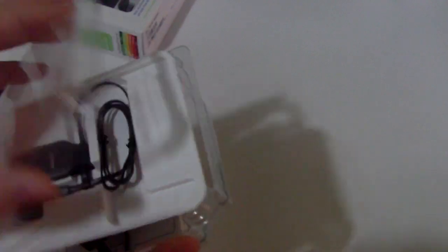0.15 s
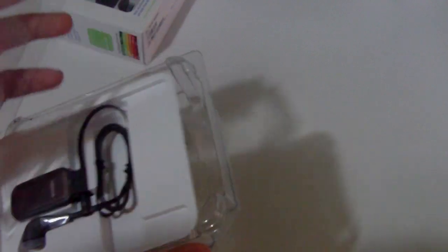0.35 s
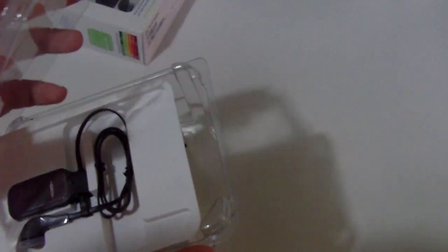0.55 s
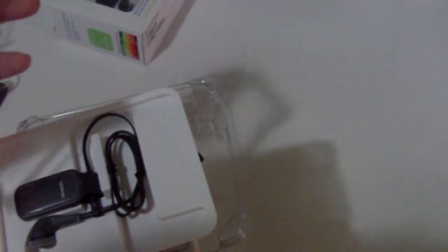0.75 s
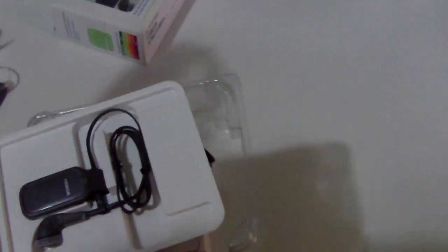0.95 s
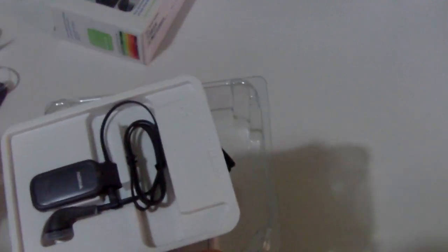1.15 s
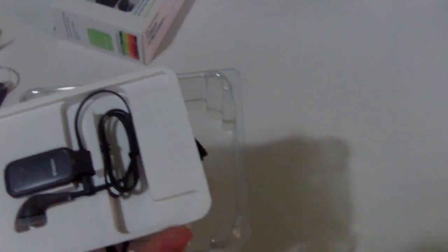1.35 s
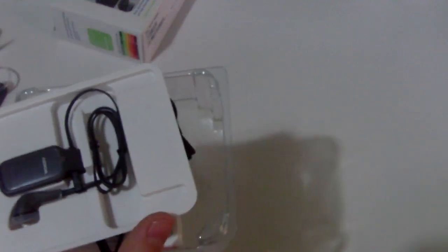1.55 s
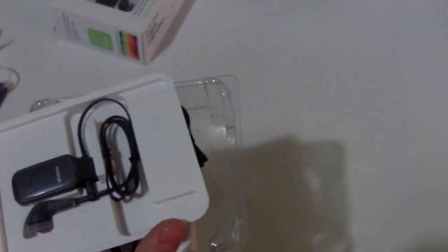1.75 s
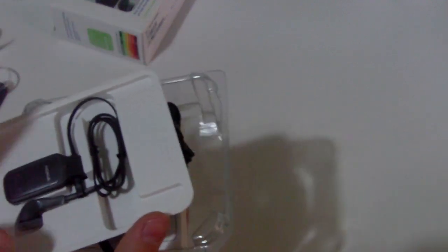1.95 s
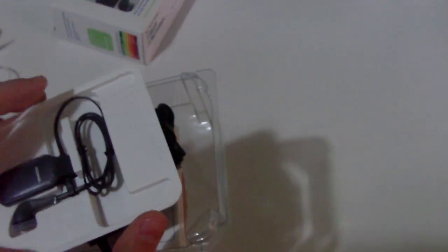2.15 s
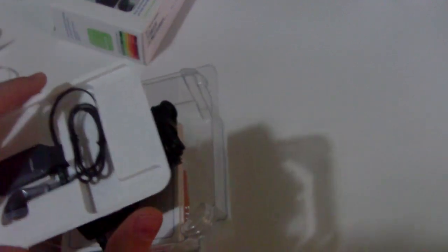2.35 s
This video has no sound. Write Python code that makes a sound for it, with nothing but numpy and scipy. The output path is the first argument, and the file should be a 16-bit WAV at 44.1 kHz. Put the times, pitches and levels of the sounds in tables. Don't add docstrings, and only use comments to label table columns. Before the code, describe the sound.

Close, dry handling of a clear plastic shell: quick crackles, one loud snap, faint card rubbing and finger slides, a brief clicky turn, then more light pops as the tray comes free, over faint room noise.

```python
import sys
import numpy as np
from scipy import signal
from scipy.fft import rfft, irfft
from scipy.io import wavfile

SR = 44100
rng = np.random.default_rng(int(sys.argv[2]) if len(sys.argv) > 2 else 0)


def to_wav(s):
    ch = np.atleast_2d(s).T
    pcm = np.round(np.clip(ch, -1, 1) * 32767)
    wavfile.write(sys.argv[1], SR, pcm.astype(np.int16))


def boost(x):
    u = np.asarray(x, float) / 20
    return 10 ** u


N = 105840

# pitch_hz, density_db_per_hz
FLOOR_SPECTRUM = [(25, -39.5), (100, -50.5), (220, -22), (600, -7.5), (1170, -1.5), (1700, -6),
                  (2550, -13.5), (15500, -31)]
# time_s, level_db
RUSTLE_LEVEL = [(0, -65), (.3, -67.5), (.62, -64), (.78, -68), (.95, -59.5), (1.1, -58.5), (1.31, -65),
                (1.345, -55.5), (1.4, -55), (1.47, -53), (1.53, -53.5), (1.63, -64.5), (1.98, -65.5),
                (2.25, -60.5), (2.4, -68)]
# pitch_hz, density_db_per_hz
RUSTLE_SPECTRUM = [(60, -32.5), (150, -18), (425, 2), (570, 4), (1100, -3), (1500, -3), (4200, -11.5),
                   (15000, -27.5)]
# time_s, level_db
HOLLOW_LEVEL = [(1.6, -71), (1.65, -59), (1.7, -52), (1.77, -56), (1.8, -62), (1.95, -60), (2.02, -74)]
# start_s, attack_s, hold_s, release_s, level_db
FINGER_SLIDES = [
    (0.903, 0.088, 0.15, 0.023, -55.5),
    (1.716, 0.11, 0.11, 0.018, -60.5),
]
# pitch_hz, density_db_per_hz
SLIDE_SPECTRUM = [(800, -48), (1600, 2), (5500, 5), (7000, 4.5), (12000, -1.5), (15500, -15)]
# start_s, length_s, level_db,
# tilt_db_per_octave, rise_share
SCUFFS = [(0.059, 0.03, -42, -12, 0.32), (.1, 0.027, -47, -19, 0.48),
          (0.145, 0.036, -65, 5.5, 0.55), (0.247, 0.021, -32, 4, 0.36),
          (0.252, 0.11, -36.5, -4, 0.045), (0.325, 0.083, -53.5, -1.5, 0.28),
          (0.447, 0.058, -48.5, -31, 0.67), (.552, 0.021, -46, -20, 0.36),
          (0.569, 0.045, -49.5, 1, 0.38), (0.607, 0.049, -50.5, -28.5, 0.33),
          (1.321, 0.037, -62.5, -3, 0.14), (1.384, 0.12, -64, 9, .05),
          (1.476, 0.29, -55.5, 1, 0.071), (2.091, 0.0451, -55.5, 5, 0.96),
          (2.131, 0.045, -51, -3, 0.18), (2.173, 0.046, -47, 3, 0.43), (2.21, .035, -69, -12, 0.25),
          (2.281, 0.08, -46.5, -4, 0.53), (2.344, 0.039, -52.5, 4.5, 0.31),
          (2.352, 0.041, -55, 5.5, 1)]
# pitch_hz, width_hz, level_db
SCUFF_RESONANCES = [(1026, 290, 0.1), (2460, 640, -1), (4980, 700, -10), (8200, 5000, -13)]
# time_s, peak_db, width_ms, sign
FACE_FLIPS = [
    (.1268, -24.5, 0.063, -1),
    (0.1942, -32, 0.18, -1),
    (0.4988, -45, 0.069, 1),
    (.2486, -10, 0.1, -1),
    (0.2548, -3.5, .15, -1),
    (1.4824, -18, 0.11, 1),
    (2.0168, -28.5, 0.12, -1),
    (2.2454, -43, 0.17, -1),
    (2.256, -17, 0.16, -1),
]
# pitch_hz, level_db
SHELL_SPECTRUM = [(250, -33.5), (500, -17), (1000, -9), (2400, 0), (5000, -4), (9000, -7.5), (15000, -9)]
# time_s, peak_db, ring_hz, treble_db, length_ms
PRY_BUCKLES = [(.009, -49.5, 1500, -12, 4.4), (.0274, -29.5, 900, -12, 1.2),
               (.0585, -30.5, 1100, -18.5, 1.49), (.071, -40, 1180, -12.5, 2.9),
               (.080, -43, 1100, -28.5, 2.5), (.0855, -23, 950, -21, 3.01), (.127, -26, 1000, -15.5, 1.77),
               (.142, -29.5, 1070, -18, 1.96), (.182, -34.5, 1470, -7.5, 2.6), (.1958, -18, 1240, -10, 2.3),
               (.225, -22.5, 2340, -33, 1.49), (.2474, -5, 2580, -11.5, 2.6), (.2510, -7.5, 5530, 4, 2.22),
               (.2535, -3.5, 2400, -14.5, 1.3), (.260, -11.5, 1200, -15, 3.8), (.269, -16, 2800, -7, 3.9),
               (.287, -29.5, 2800, -1, 1.5), (.3035, -27.5, 2260, 0, 2.8), (.334, -33.5, 1080, -4, 2.7),
               (.343, -27, 1580, -11.5, 2.7), (.378, -35.5, 1310, -14.5, 2.14), (.498, -41, 2700, -8, 0.65)]
# time_s, peak_db, ring_hz, treble_db, length_ms
TURN_BUCKLES = [(.461, -42.5, 1090, -36, 1.54), (.489, -50, 1190, -21, 1.37), (.571, -36, 917, -35.5, 3.6),
                (.620, -42, 942, -45, 2.5), (.634, -44.5, 950, -30, 2.15), (.679, -49, 907, -30.5, 4.7),
                (.686, -44, 926, -39, 2.1), (.9525, -41, 1305, -9.5, 1.9), (1.057, -47.5, 523, -38.5, 1.16),
                (1.073, -57, 550, -25, 0.82), (1.132, -47, 2720, -20, 6.0), (1.142, -43.5, 3070, -16, 4.6),
                (1.221, -54, 4800, -15, 1.1), (1.332, -39.5, 575, -2, 0.85), (1.3435, -49, 694, -4, 0.63),
                (1.3684, -33.5, 2900, -13, 1.03), (1.388, -27, 600, -4, 1.57), (1.3905, -38, 3650, 15, 2.1),
                (1.3945, -29.5, 706, -6.5, 4.5), (1.399, -44, 3870, 5, 1.6), (1.427, -41, 7500, 3, 4.8),
                (1.4455, -38.5, 7400, 2, 1), (1.477, -52, 4500, -16, 1.5), (1.4835, -31, 1800, -15, 0.62),
                (1.5088, -34, 3170, -2, 1.24), (1.5115, -28.5, 584, -16, 2.78), (1.673, -46, 2830, -8, 2.1),
                (1.692, -52, 1280, -31.5, 2.4)]
# time_s, peak_db, ring_hz, treble_db, length_ms
PULL_BUCKLES = [(2.0058, -40.5, 5130, -14.5, 1.3), (2.0158, -35.5, 1200, -27, 1.6),
                (2.048, -43, 1130, -22, 1.33), (2.0662, -37.5, 888, -43, 2), (2.076, -48, 1150, -14, 3.5),
                (2.089, -45, 1190, -30, 1.55), (2.1068, -31, 1150, -33, 2.64),
                (2.1408, -31.5, 1190, -19, 2.0), (2.1455, -35, 555, -32, 1.6),
                (2.188, -32.5, 3030, -19, 2.13), (2.1915, -28, 1050, -11, 1.62),
                (2.198, -33, 5200, -21, 2.9), (2.204, -38, 2250, -27, 3.1),
                (2.2462, -23.5, 1240, -20.5, 2.27), (2.2565, -29, 1120, -13, 0.93),
                (2.271, -36, 4970, -8, 0.79), (2.2742, -29.5, 2700, -23, 1.14),
                (2.2748, -26, 5070, -21.5, 0.956), (2.2868, -27, 990, -20, 3.2),
                (2.294, -38, 960, -27, 0.94), (2.312, -41, 1000, -31, 2.0), (2.329, -37.5, 1030, -30, 1),
                (2.382, -41, 2500, -6, 2.5)]


def rms_one(x):
    return x / np.sqrt(np.mean(x ** 2) + 1e-20)


def at(points, x, warp=np.log):
    p = np.array(points)
    return np.interp(warp(x), warp(p[:, 0]), p[:, 1])


def colour(x, spectrum):
    hz = np.maximum(np.arange(len(x) // 2 + 1) * SR / len(x), 10)
    return irfft(rfft(x) * boost(at(spectrum, hz)), len(x))


def peak(x, hz, width_hz):
    r = np.exp(-np.pi * width_hz / SR)
    feedback = [1, -2 * r * np.cos(2 * np.pi * hz / SR), r * r]
    return signal.lfilter([(1 - r * r) / 2, 0, (r * r - 1) / 2], feedback, x)


def low_cut(x, hz):
    return signal.sosfilt(signal.butter(3, hz, "high", fs=SR, output="sos"), x)


def drift(rate_hz):
    r = np.exp(-2 * np.pi * rate_hz / SR)
    wander = signal.lfilter([1], [1, -2 * r, r * r], rng.standard_normal(N + SR))
    return rms_one(wander[SR:])


def grains(per_s, spread_db):
    size_db = spread_db * np.minimum(rng.exponential(1, N), 4)
    size = boost(size_db) * rng.choice([-1, 1], N)
    return rms_one(size * (rng.random(N) < per_s / SR))


def room_floor():
    return boost(-64.5) * rms_one(colour(rng.standard_normal(N), FLOOR_SPECTRUM))


def room(x):
    t60_s, build_up_s, treble_decay_s, wall_cut_hz = 0.25, 0.011, 0.12, 9200
    t = np.arange(SR // 2) / SR
    noise = rng.standard_normal((2, SR // 2))
    dull = signal.lfilter(*signal.butter(1, wall_cut_hz / 3, fs=SR), noise[0])
    bright = 0.21 * noise[1] * np.exp(-t / treble_decay_s)
    tail = (dull + bright) * boost(-60 * t / t60_s) * np.clip(t / build_up_s, 0, 1)
    return signal.fftconvolve(x, tail / np.sqrt(np.sum(tail ** 2)))[:N]


def rustle():
    hollow_hz = 1280
    t = np.arange(N) / SR
    rub = rms_one(colour(grains(5700, 2.5), RUSTLE_SPECTRUM))
    rub = rub * boost(at(RUSTLE_LEVEL, t, np.asarray) + 1.5 * drift(25))
    narrow = peak(grains(4000, 3.1), hollow_hz, 60)
    hollow = rms_one(peak(narrow, hollow_hz, 340))
    gate = (t > HOLLOW_LEVEL[0][0]) & (t < HOLLOW_LEVEL[-1][0])
    return rub + hollow * gate * boost(at(HOLLOW_LEVEL, t, np.asarray) - 3.5)


def slides():
    echo_s, echo_gain = 0.0003, 0.4
    t = np.arange(N) / SR
    hiss = colour(rng.standard_normal(N), SLIDE_SPECTRUM)
    hz = np.arange(N // 2 + 1) * SR / N
    echo = irfft(rfft(hiss) * np.exp(-2j * np.pi * hz * echo_s), N)
    hiss = rms_one(hiss + echo_gain * echo)
    swell = np.zeros(N)
    for start, attack, hold, release, db in FINGER_SLIDES:
        corners = np.cumsum([start, attack, hold, release])
        swell += boost(db) * np.interp(t, corners, [0, 0.99, 0.38, 0.068])
    return hiss * swell * boost(0.98 * drift(9.6))


def scuffs():
    t = np.arange(N) / SR
    grit = grains(14000, 3)
    out = np.zeros(N)
    for hz, width_hz, db in SCUFF_RESONANCES:
        swell = np.zeros(N)
        for start, length, level_db, tilt_db, rise in SCUFFS:
            gain = boost(level_db + db + tilt_db * np.log2(hz / 1000))
            swell += gain * np.interp(t, [start, start + rise * length, start + length], [0, 1, 0])
        out += peak(grit * swell, hz, width_hz) * np.sqrt(SR / width_hz / 4)
    return signal.sosfilt(signal.butter(2, 9600, fs=SR, output="sos"), out)


def pops():
    t = np.arange(N) / SR
    push = np.zeros(N)
    for s, db, width_ms, sign in FACE_FLIPS:
        push += sign * boost(db) * np.exp(-((t - s) * 1000 / width_ms) ** 2)
    return low_cut(push, 714) + boost(-36.5) * push


def slip_burst(length_ms, delays, sizes):
    shares = np.cumsum(0.15 + 0.3 * np.abs(delays))
    shares = shares - shares[0]
    burst = np.zeros(2048)
    for share, size in zip(shares, sizes):
        position = share * length_ms / 1000 * SR
        i = int(position)
        slip = np.sign(size) * boost(-8 * share + 2 * size)
        burst[i:i + 2] += slip * np.array([1 + i - position, position - i])
    return burst


def buckles(rows):
    t60_s, t60_slope, rise_cycles = 0.037, 0.8, 0.71
    ring_db, ring_oct, region_db, region_oct = 10.5, 0.2, 6.5, 1.7
    usual_treble_db, mode_spread_db = -18, 2
    t = np.arange(3072) / SR
    hz = np.geomspace(300, 16000, 150)
    decay_rate = np.log(1000) * (np.maximum(hz, 800) / 1000) ** t60_slope / t60_s
    rings = np.exp(-np.outer(decay_rate, t))
    rings = rings * (1 - np.exp(-np.outer(hz, t) / rise_cycles))
    out = np.zeros(N + SR)
    for s, db, ring_hz, treble_db, length_ms in rows:
        level, detune, slip = rng.standard_normal((3, len(hz)))
        octaves = np.log2(hz / ring_hz)
        gain_db = at(SHELL_SPECTRUM, hz) + mode_spread_db * level
        gain_db += ring_db * np.exp(-(octaves / ring_oct) ** 2)
        gain_db += region_db * np.exp(-(octaves / region_oct) ** 2)
        gain_db += (treble_db - usual_treble_db) * np.clip(np.log2(hz / 2000), 0, 1)
        modes = rings * np.sin(2 * np.pi * np.outer(hz * (1 + 0.01 * detune), t))
        body = (boost(gain_db) * np.sign(slip)) @ modes
        hit = signal.fftconvolve(slip_burst(length_ms, slip[:6], detune[:6]), body)
        i = int(s * SR)
        out[i:i + len(hit)] += boost(db) * hit / np.abs(hit).max()
    return out[:N]


def scene():
    shell = buckles(PRY_BUCKLES) + buckles(TURN_BUCKLES) + buckles(PULL_BUCKLES) + scuffs()
    near = low_cut(shell, 290) + pops()
    return (near + boost(-16) * room(near) + slides() + rustle() + room_floor())[None]


def low_pass(x):
    return signal.sosfilt(signal.butter(12, 16510, fs=SR, output="sos"), x)


def record(dry):
    x = signal.sosfilt(signal.cheby2(10, 32, 1.025 * 14900, fs=SR, output="sos"), dry)
    x = x - 0.94 * peak(x, 7830, 190)
    return low_pass(x)


dry = scene()
out = record(dry)
to_wav(out)
```